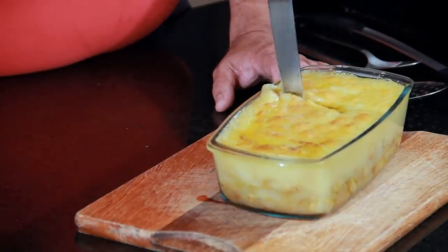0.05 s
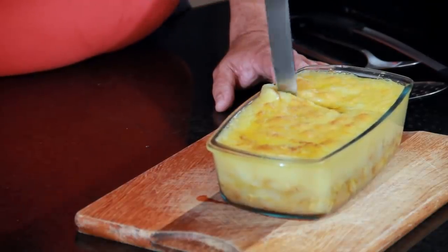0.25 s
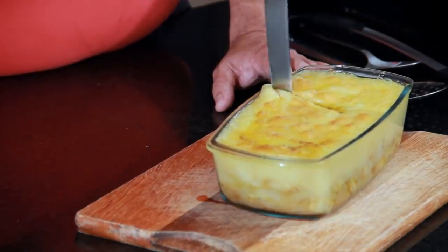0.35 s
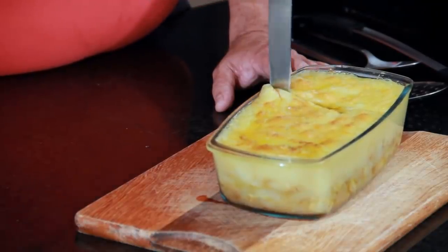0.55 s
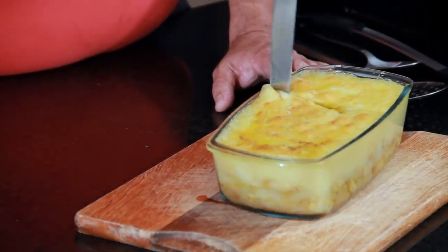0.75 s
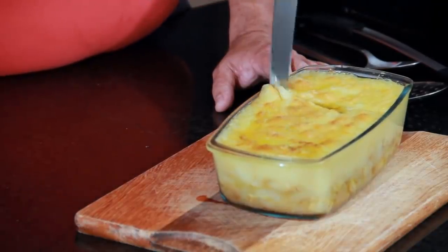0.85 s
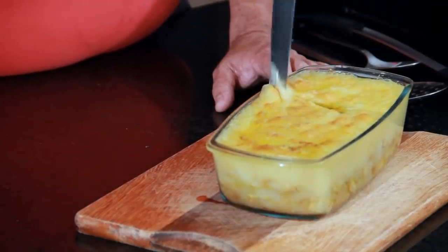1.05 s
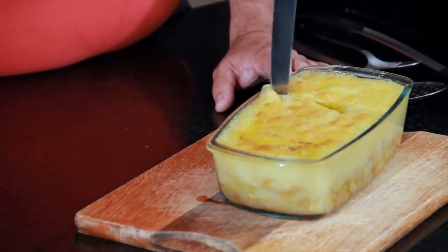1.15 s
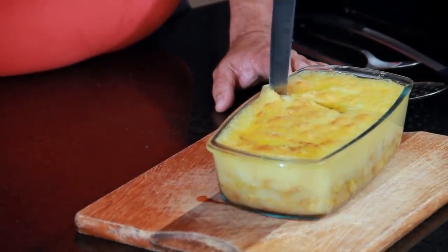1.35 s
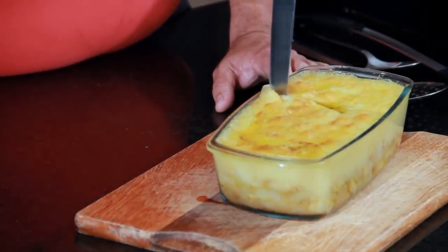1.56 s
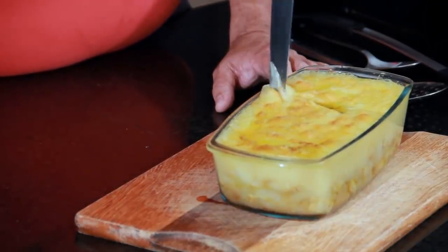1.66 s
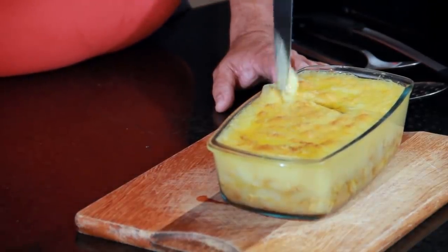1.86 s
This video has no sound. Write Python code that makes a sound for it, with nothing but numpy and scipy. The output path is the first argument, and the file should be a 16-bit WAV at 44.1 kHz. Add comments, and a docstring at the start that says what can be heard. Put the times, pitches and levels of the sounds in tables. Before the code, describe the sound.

Knife cutting a crunchy baked crust: two hard glassy knocks, then quick light crackly taps

```python
"""A knife works through a baked crust in a glass dish on a wooden board.
Two knocks, then jabs about five times a second, are contact noise exciting damped modes of dish and blade.
Between jabs the crust snaps in dry ticks and rasps as streams of tiny fractures; the blade squeaks once
by stick-slip and the filling squelches as narrow-band noise in the hollow of the cut.
A hard-walled kitchen rings after each click by decaying noise, over still air and a faint sine hum."""
import sys
import numpy as np
from scipy import signal
from scipy.fft import rfft, irfft, next_fast_len
from scipy.io import wavfile

SR = 44100
rng = np.random.default_rng(int(sys.argv[2]) if len(sys.argv) > 2 else 0)


def to_wav(sig):
    """Store sig (one row per channel, or 1-D mono) as 16-bit WAV at the path in sys.argv[1].

    Samples outside -1..1 are clipped; the rate is SR.
    """
    pcm = np.clip(np.atleast_2d(sig), -1, 1) * 32767
    pcm = np.round(pcm).astype(np.int16)
    wavfile.write(sys.argv[1], SR, pcm.T)  # frames by channels


N = 83790  # samples heard
LEAD = SR // 4  # samples computed ahead of time zero, so that earlier echoes are heard
TREBLE_HZ = 3220  # marks the treble, and where the bending-wave lag has halved


def undb(db):
    """Amplitude ratio from a level: 20 dB is a factor of ten."""
    return 10 ** (np.asarray(db) / 20)


def unit(x):
    """Normalisation to unit energy, the sum of the squared samples."""
    return x / np.sqrt(np.sum(x ** 2))


def noise(n):
    """White noise of rms 1: equal spectral magnitudes with random phases."""
    phases = 2 * np.pi * rng.random(n // 2 + 1)
    return unit(irfft(np.exp(1j * phases), n)) * np.sqrt(n)


def colour(x, points, modes=(), floor_db=0, pitch=1):
    """Minimum-phase filter: (Hz, dB) points plus damped resonances (Hz, width Hz, dB), summed in power."""
    n = 2 * next_fast_len(len(x))
    hz, db = np.array(points, float).T
    f = np.maximum(np.arange(n // 2 + 1) * SR / n, 1)
    power = undb(floor_db + np.interp(np.log(f), np.log(hz), db)) ** 2
    for centre, width, peak in modes:
        mode_hz = centre * pitch
        detune = (f / mode_hz - mode_hz / f) * centre / width
        # the second divisor makes the far skirts fall faster
        power = power + undb(peak) ** 2 / (1 + detune ** 2) / (1 + (detune / 5) ** 2)
    # folding the cepstrum onto positive times makes the filter causal
    cepstrum = irfft(np.log(power) / 2)
    cepstrum[1:n // 2] *= 2
    cepstrum[n // 2 + 1:] = 0
    response = np.exp(rfft(cepstrum))
    return irfft(rfft(x, n) * response)[:len(x)]


def swell(t, rise_s, fall_s):
    """Exponential onset and decay of energy, starting at t = 0."""
    t = np.maximum(t, 0)
    return (1 - np.exp(-t / rise_s)) * np.exp(-t / fall_s)


def add(out, start_s, x):
    """Superposition: mix a sound into a track that begins LEAD samples before time zero."""
    i = max(int(start_s * SR) + LEAD, 0)
    out[i:i + len(x)] += x[:len(out) - i]


def contact(rise_s, fall_s):
    """Broadband contact chatter, dispersed like bending waves so that the lows arrive last."""
    length = 4096  # samples
    bass_lag_s = 0.00136
    shape = swell(np.arange(length) / SR, rise_s, fall_s)
    burst = noise(length) * shape
    # flatten the spectrum, then confine the burst in time again
    burst = irfft(np.exp(1j * np.angle(rfft(burst)))) * shape ** .3
    hz = np.arange(length // 2 + 1) * SR / length
    lag_s = bass_lag_s / (1 + (hz / TREBLE_HZ) ** 2)
    # phase is the integral of group delay over frequency
    phase = 2 * np.pi * np.cumsum(lag_s) * SR / length
    return unit(irfft(rfft(burst) * np.exp(-1j * phase)))


def brighten(x, treble_db, bass_db=0):
    """Spectral tilt of an impact: a harder contact lifts the treble, a heavier one the bass."""
    bass_hz = 386
    return colour(x, [(bass_hz, bass_db), (TREBLE_HZ / 2, 0), (TREBLE_HZ * 2, treble_db)])


def knocks(gain_db):
    """Impact excitation of modes: the blade strikes the glass and the filled dish rings very briefly."""
    # Hard knocks; only the echo of the first is heard.
    # Each row: start in seconds, relative level in dB, bass in dB, treble in dB, pitch ratio.
    strikes = [(-.15, -1, 2, 4, 0.94), (0.0768, -1.5, 4, 0.5, 0.97), (0.3063, 1.5, 1, 1, 0.96)]
    # Contact noise between the modes. Each row: frequency in Hz, relative level in dB.
    contact_colour = [(100, -33), (210, -13), (450, -9.5), (1200, -4.5), (2150, -5.5), (2700, -36),
                      (3200, -24.5), (6800, -22), (8200, -33), (10500, -23.5), (12000, -50), (16000, -50)]
    # Modes of the dish. Each row: frequency in Hz and width in Hz at pitch ratio 1, relative peak in dB.
    dish_modes = [(250, 94, 0), (423, 73, -1.5), (734, 230, -7.5), (1090, 50, -1.5), (1677, 158, 5.5),
                  (1910, 176, 4), (3860, 100, -14), (4740, 66, -16), (5840, 76, -13.5), (6930, 174, -6),
                  (10120, 300, -11), (11000, 130, -10.5), (14000, 310, -30)]
    out = np.zeros(LEAD + N)
    for start_s, db, bass_db, treble_db, pitch in strikes:
        chatter = contact(rise_s=.003, fall_s=.0009)
        hit = unit(colour(chatter, contact_colour, dish_modes, floor_db=1, pitch=pitch))
        add(out, start_s, undb(db + gain_db) * brighten(hit, treble_db, bass_db))
    return out


def kitchen(x):
    """Reverberation by convolution: dull worktop reflections and a tail with its own decay in each band."""
    # Room tail. Each row: band centre in Hz, relative level in dB, 60 dB decay time in seconds.
    room_bands = [(107, 3.5, 0.2), (270, -6.5, 0.87), (423, -5.5, 1), (590, -2.5, 1), (930, -3, 1),
                  (1740, -10.5, 0.75), (2970, -5, 0.93), (4820, -12, .7), (6420, -11.5, 0.64),
                  (7290, -9, 0.67), (6850, -7.5, 0.44), (8100, -11.5, 0.34), (10200, -20, 0.64),
                  (16000, -10, .35)]
    # Reflections off the worktop. Each row: frequency in Hz, relative level in dB.
    worktop_colour = [(110, -13.5), (300, 2), (800, 0.5), (1700, -3), (5000, -8.5), (12000, -16)]
    t = np.arange(SR) / SR
    hz, db, t60_s = np.array(room_bands).T
    spectrum = rfft(noise(SR))  # one second, so the bins are 1 Hz apart
    log_f = np.log(np.maximum(np.arange(len(spectrum)), 1))
    tail = 0
    for k, share in enumerate(np.eye(len(hz))):
        # triangular bands on a log-frequency axis, summing to one
        band = irfft(spectrum * np.interp(log_f, np.log(hz), share), SR)
        decay = unit(swell(t, rise_s=0.012, fall_s=t60_s[k] / np.log(1000)))
        tail = tail + undb(db[k]) * band * decay
    worktop_delay_s, worktop_db = .004, -7
    near = noise(SR) * unit(swell(t - worktop_delay_s, rise_s=0.00031, fall_s=.009))
    near = undb(worktop_db) * colour(near, worktop_colour)
    return signal.fftconvolve(x, tail + near)[:len(x)]


def room_tone():
    """Stationary background: filtered noise for still air and a sine for the hum of an appliance."""
    # Spectrum of the air. Each row: frequency in Hz, relative level in dB per Hz.
    air_colour = [(20, -14.5), (32, 2), (58, -8), (95, -6), (150, -3.5), (220, -1), (300, -9), (420, -3.5),
                  (600, -14), (780, -5), (1100, -17.5), (1600, -17.5), (2100, -23.5), (2900, -32.5),
                  (7000, -34.5), (15000, -36), (16500, -55)]
    air_db, hum_hz, hum_db = -53.5, 61, -64  # rms levels
    air = unit(colour(noise(N), air_colour)) * np.sqrt(N)
    hum = np.sqrt(2) * np.sin(2 * np.pi * hum_hz * np.arange(N) / SR)
    return undb(air_db) * air + undb(hum_db) * hum


def slide(t, length_s):
    """Rounded envelope of one short frictional slide: the square root of a half sine."""
    return np.sqrt(abs(np.sin(np.pi * np.clip(t / length_s, 0, 1))))


def rasps(t, grains_per_s, scatter_db):
    """Random impulses of fracture: a faint drag, and short slides that each ring at their own pitch."""
    # Drag of the blade in the crust. Each row: time in seconds, rms level in dB.
    drag_curve = [(.8, -81), (1.2, -70), (1.33, -63.5), (1.48, -59.5), (1.58, -60), (1.68, -60.5),
                  (1.78, -61), (1.9, -64.5)]
    # Short slides. Each row: start in seconds, length in seconds, level in dB, resonance in Hz.
    slides = [(1.318, 0.022, -49, 7640), (1.36, 0.015, -49.5, 7000), (1.505, 0.022, -49.5, 4307),
              (1.552, 0.012, -50, 5600), (1.559, 0.012, -46.5, 4800)]
    # Crust under the blade. Each row: frequency in Hz, relative level in dB.
    crust_colour = [(200, -2), (800, 6.5), (1050, 15.5), (1300, -0.5), (2800, 5.5), (3400, -3), (5000, 4),
                    (8000, 0.5), (11000, -9.5), (16000, -24)]
    peak_width_hz, peak_db = 310, 12
    fractures = rng.random(len(t)) < grains_per_s / SR
    grains = fractures * rng.standard_normal(len(t))
    # a few fractures are stronger
    grains = grains * undb(scatter_db * np.minimum(rng.exponential(size=len(t)), 4))
    out = undb(np.interp(t, *np.array(drag_curve).T)) * unit(colour(grains, crust_colour))
    for start_s, length_s, db, hz in slides:
        ringing = unit(colour(grains, crust_colour, [(hz, peak_width_hz, peak_db)]))
        out = out + undb(db) * slide(t - start_s, length_s) * ringing
    return out * np.sqrt(len(t))  # from unit energy to rms 1


def snaps(gain_db):
    """Brittle fracture: bits of crust break, each releasing a dry broadband tick."""
    # Each row: start in seconds, relative level in dB, treble in dB.
    breaks = [(.5145, -25.5, -17.5), (1.4387, -24.5, 2), (1.6320, -17.5, -3.5), (1.6528, -46, -1),
              (1.6885, -42.5, 4), (1.8190, -23.5, -7.5)]
    # Spectrum of a breaking crust. Each row: frequency in Hz, relative level in dB.
    snap_colour = [(100, -16), (500, 1.5), (1000, 11.5), (1250, -2.5), (2200, -1), (3400, -15.5), (5400, 3),
                   (8000, -7.5), (10500, -3), (12500, -16), (16000, -22)]
    out = np.zeros(LEAD + N)
    for start_s, db, treble_db in breaks:
        tick = unit(colour(contact(rise_s=.002, fall_s=.001), snap_colour))
        add(out, start_s, undb(db + gain_db) * brighten(tick, treble_db))
    return out


def jabs(gain_db):
    """Impact excitation of the blade's modes as the tip meets the bottom through the soft filling."""
    # Jabs of the tip on the bottom.
    # Each row: start in seconds, relative level in dB, bass in dB, treble in dB, pitch ratio.
    stabs = [(0.828, -23, 1, -2, 0.97), (1.0221, -19, 1.5, 1, .997), (1.2232, -19, -1, 0, 1.006),
             (1.4156, -19.5, 1, -1, 0.98), (1.6012, -15, 0, 2, 0.976), (1.8052, -22.5, 0.5, -2, 0.982)]
    # Contact noise between the modes. Each row: frequency in Hz, relative level in dB.
    contact_colour = [(80, -11.5), (200, -3.5), (600, -29), (1200, -20), (2600, -14.5), (3200, -30.5),
                      (4600, -14.5), (7200, -31), (8500, -26), (15000, -31)]
    # Modes of the blade. Each row: frequency in Hz and width in Hz at pitch ratio 1, relative peak in dB.
    blade_modes = [(215, 57, 2), (556, 195, 3), (850, 31, 2.5), (1270, 99, -5), (1740, 90, -4.5),
                   (2144, 156, -3), (4040, 96, -11.5), (4700, 430, -9), (5600, 100, -37), (6960, 374, -4.5),
                   (9400, 120, -16), (11030, 154, -1), (13900, 230, -14), (14800, 210, -18)]
    out = np.zeros(LEAD + N)
    for start_s, db, bass_db, treble_db, pitch in stabs:
        chatter = contact(rise_s=.0005, fall_s=.0015)
        hit = unit(colour(chatter, contact_colour, blade_modes, floor_db=1, pitch=pitch))
        add(out, start_s, undb(db + gain_db) * brighten(hit, treble_db, bass_db))
    return out


def wobbly_tone(hz, width_hz):
    """Narrow-band noise shifted up by a gliding carrier: an unsteady tone on a pitch curve, rms 1."""
    n = len(hz)
    lowpass = signal.butter(2, width_hz / 2, fs=SR, output="sos")
    band = signal.sosfilt(lowpass, noise(n) + 1j * noise(n))
    carrier = np.exp(2j * np.pi * np.cumsum(hz) / SR)
    return unit(np.real(band * carrier)) * np.sqrt(n)


def hollow(t):
    """Cavity resonance: as the blade moves, the filling squelches softly in the hollow of the cut."""
    # Pitch of the hollow, higher once the cut is open. Each row: time in seconds, frequency in Hz.
    pitch_curve = [(.83, 790), (1.07, 730), (1.25, 792.6), (1.34, 1014), (1.65, 952), (1.9, 980)]
    # Soft squelches of the filling. Each row: start in seconds, relative level in dB.
    squelches = [(.83, -45), (1.029, -41.5), (1.228, -47.5), (1.317, -47), (1.426, -45), (1.615, -50),
                 (1.812, -48.5)]
    gain_db = 3.5
    push = sum(undb(db) * swell(t - start_s, rise_s=0.017, fall_s=0.025) for start_s, db in squelches)
    tone = wobbly_tone(np.interp(t, *np.array(pitch_curve).T), width_hz=150)
    return undb(gain_db) * push * tone


def squeak(t):
    """Stick-slip friction: the blade squeaks thinly once against the crust."""
    start_s, length_s, level_db = 1.576, .02, -52
    tone = wobbly_tone(np.full(len(t), 5350), width_hz=550)  # centred on 5350 Hz
    return undb(level_db) * slide(t - start_s, length_s) * tone


def scene():
    """Superposition of knife, dish and crust, the kitchen's response to them, and the background."""
    t = np.arange(-LEAD, N) / SR
    dry = knocks(gain_db=7.5) + jabs(gain_db=9) + snaps(gain_db=8.5)
    dry = dry + rasps(t, grains_per_s=2000, scatter_db=0.5) + squeak(t) + hollow(t)
    wet = dry + kitchen(dry)
    return (wet[LEAD:] + room_tone())[None]


def record(dry):
    """Band limitation: a steep elliptic low-pass removes everything well above 16 kHz."""
    lowpass = signal.ellip(8, .2, 70, 16000, fs=SR, output="sos")  # 0.2 dB ripple, 70 dB rejection
    return signal.sosfilt(lowpass, dry)


dry = scene()
out = record(dry)
to_wav(out)
```